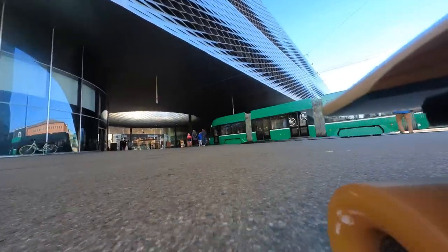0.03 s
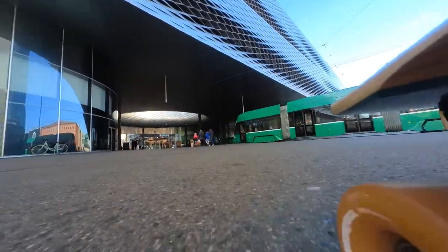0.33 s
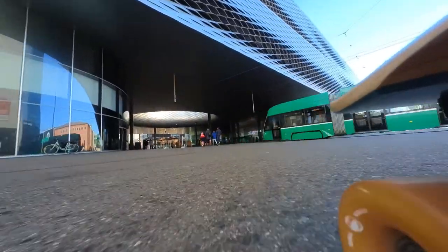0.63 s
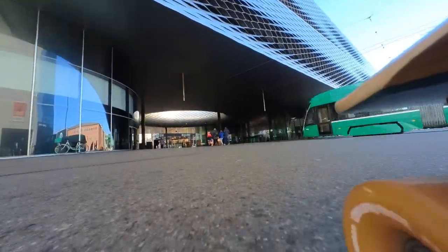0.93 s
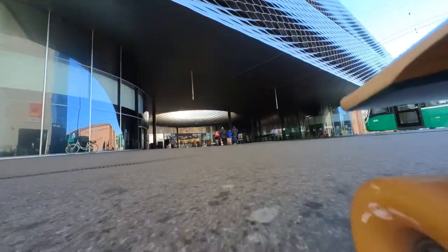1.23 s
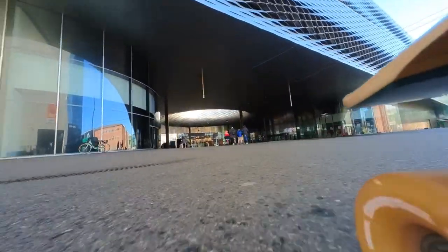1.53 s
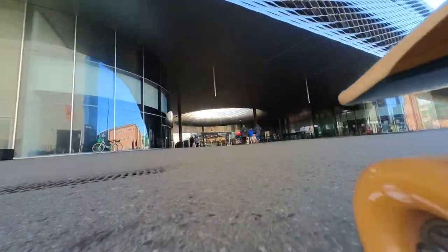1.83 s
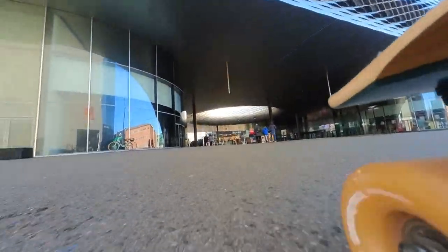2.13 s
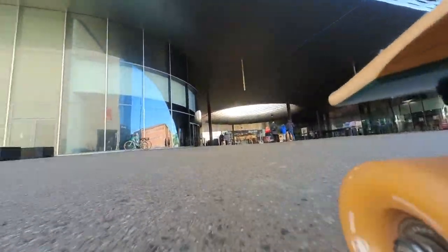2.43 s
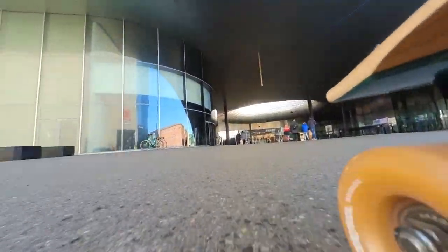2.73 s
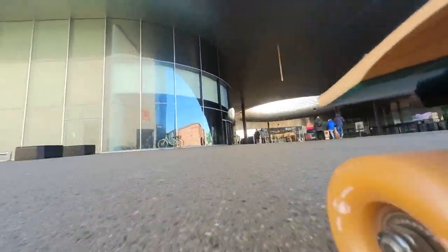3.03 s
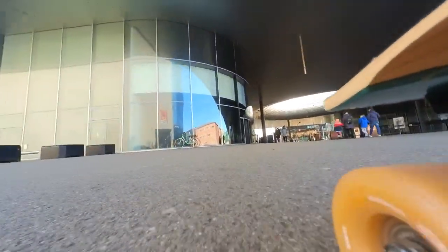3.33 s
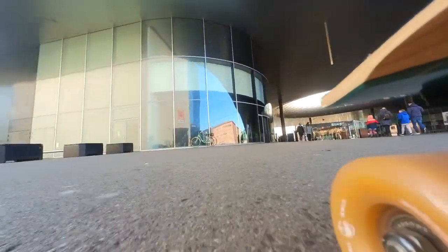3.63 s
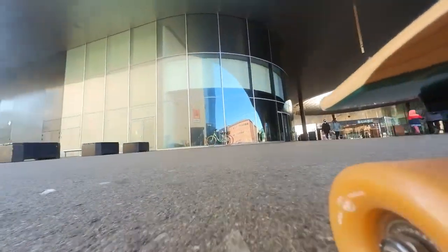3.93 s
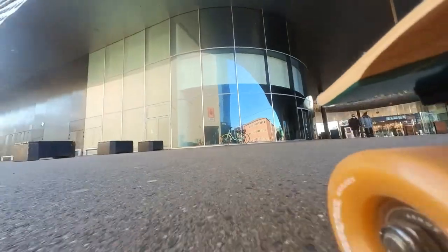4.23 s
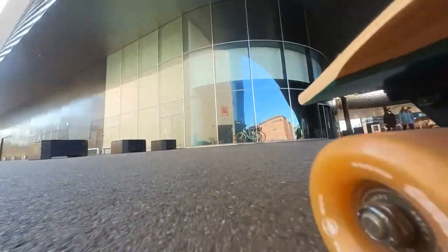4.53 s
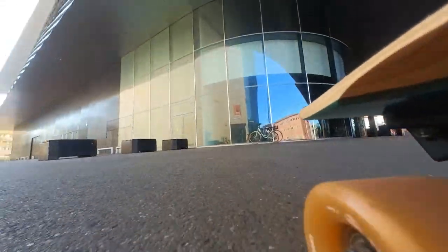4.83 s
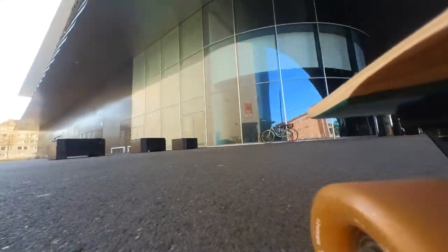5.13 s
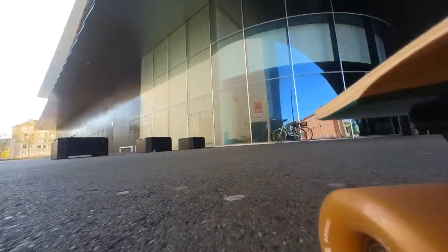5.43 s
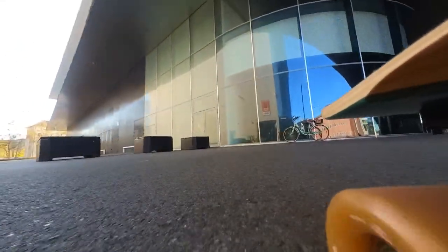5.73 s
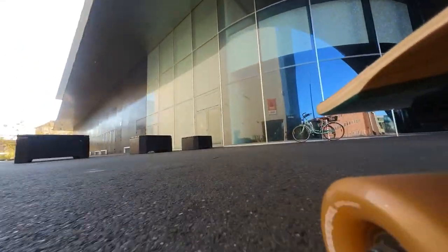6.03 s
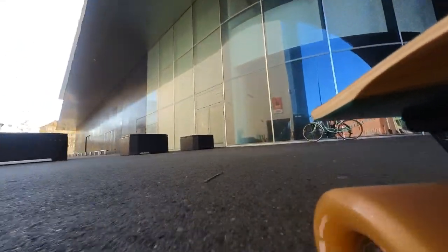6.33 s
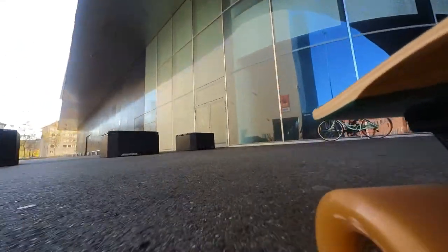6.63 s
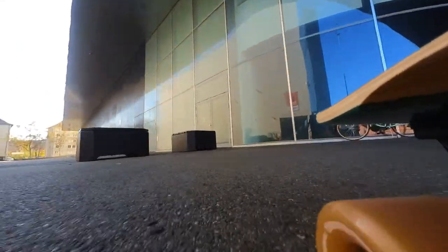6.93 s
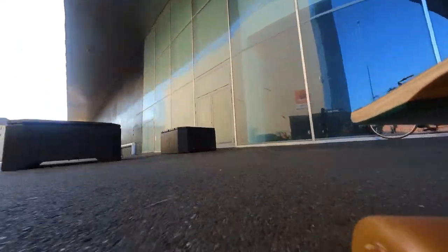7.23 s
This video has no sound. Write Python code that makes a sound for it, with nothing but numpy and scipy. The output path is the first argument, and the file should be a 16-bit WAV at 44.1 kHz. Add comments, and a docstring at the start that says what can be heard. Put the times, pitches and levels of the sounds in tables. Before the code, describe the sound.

A skateboard rolls over asphalt throughout, heard from right beside one wheel: a low, drumming rumble with fine hiss and scattered crunches of grit. A tram's steel wheels hiss and sing faintly on the rails for the first two seconds, fading by about three. The board bumps at 1.8 seconds, crunches over sand at 2.2, and thumps several times between 2.9 and 3.5. From about 4.1 to 4.6 seconds the wheels scrub sideways through a turn, the truck rattles and small stones tick away. The rolling is quieter around five seconds. From 5.5 seconds rough patches bring clusters of loud deck thumps and wheel knocks, with a sharp gritty crunch and clack at 6.5. More scrubbing, clacks and bumps follow from 6.9 until the end at about 7.5 seconds. The plaza roof overhead adds a faint echo.

```python
"""Skateboard under a plaza roof

Heard from beside one wheel: stones in the asphalt drum on wheels and deck, grit crackles under the tread.
The treads scrub and the truck rattles through a turn. The board quietens, then thumps over rough patches.
A tram's steel wheels hiss and sing on the rails at the start; the roof adds a faint echo."""
import sys
import numpy as np
from scipy import signal
from scipy.fft import rfft, irfft
from scipy.io import wavfile
from scipy.ndimage import uniform_filter1d, minimum_filter1d, map_coordinates

SR = 44100
rng = np.random.default_rng(int(sys.argv[2]) if len(sys.argv) > 2 else 0)


def store_wav(level_fs):
    """Save 16-bit WAV to argv[1]."""
    pcm = np.round(np.clip(np.atleast_2d(level_fs), -1, 1) * 32767)
    wavfile.write(sys.argv[1], SR, pcm.T.astype(np.int16))


N = 330309

# Spectra of deck rumble, grit hiss and crushed grains. Each row: frequency in Hz, level in dB.
DECK_SPECTRUM = [(20, -36), (35, -54), (50, -22), (75, -6.5), (110, -2.5), (160, -3), (220, -3.5),
                 (300, -10), (420, -23), (800, -56), (2000, -96)]
GRIT_SPECTRUM = [(1500, -26), (3000, -2.5), (4000, 2.5), (5500, -1), (7500, 1.5), (9700, -3.5),
                 (10600, -8.5), (11500, -18.5), (13000, -27), (15000, -46)]
CRUNCH_SPECTRUM = [(300, -26), (900, 4.5), (2000, 6.5), (3000, 8.5), (4500, 0.5), (6500, -25), (10000, -37),
                   (14000, -75)]
# The rider's weight shift. Each row: time in seconds, share on the far side from 0 to 1.
WEIGHT_SHIFT = [(4.3, 0.11), (5.2, 0.9)]
# Axle resonances after the shift. Each row: frequency in Hz, width in Hz, lift in dB.
SHIFTED_AXLE_MODES = [(487, 134, 6.8), (622, 140, 5.1)]
# Sideways slips. Each row: start in seconds, length in seconds, crackle, growl and rasp in dB.
SLIPS = [(4.114, 0.287, -46.5, -35.5, -57), (4.41, 0.14, -46, -34.5, -57), (6.9, 0.3, -51, -34, -57),
         (7.197, 0.074, -53, -29.5, -47), (7.33, 0.16, -54, -33, -68)]
SLIP_ATTACK_S, SLIP_RELEASE_S = 0.013, 0.024


def amp(db):
    """Decibels to gain."""
    return 10 ** (np.asarray(db) / 20)


def unit(x):
    """x at rms 1."""
    return x / np.sqrt(np.mean(x ** 2) + 1e-20)


def even(x, span_s):
    """x held near rms 1 over stretches of span_s."""
    width = max(int(span_s * SR), 2)
    power = uniform_filter1d(uniform_filter1d(x ** 2, width), width)
    return x / np.sqrt(np.abs(power) + 1e-20)


def along(points, hz):
    """(Hz, value) points read on a log axis."""
    knots_hz, values = np.transpose(points)
    return np.interp(np.log(hz + 1), np.log(knots_hz + 1), values)


def curves(rows):
    """One value per sample for each column after the time."""
    times_s, *columns = np.transpose(rows)
    return [np.interp(np.arange(N) / SR, times_s, column) for column in columns]


def swells(rows, attack_s, release_s):
    """One gain curve per dB column; each row rises, holds and dies away."""
    gains = 0
    for start_s, length_s, *levels_db in rows:
        t = np.arange(N) / SR - start_s
        envelope = np.clip(t / attack_s, 0, 1) * np.exp(-np.maximum(t - length_s, 0) / release_s)
        gains = gains + amp(levels_db)[:, None] * envelope
    return gains


def wobble(rate_hz):
    """Smooth random curve with knots at rate_hz."""
    knots = rng.standard_normal(int(N * rate_hz / SR) + 4)
    return map_coordinates(knots, [np.arange(N) * rate_hz / SR])


def response(spectrum, modes=None, size=8192):
    """Minimum-phase impulse response of a spectrum lifted by resonances, by default the board's."""
    # Deck, truck and bearing resonances. Each row: frequency in Hz, width in Hz, lift in dB.
    board_modes = [(108, 52, 3), (209.8, 34, 4), (1920, 244, 6), (3200, 290, 2), (4040, 220, 5),
                   (5450, 200, 1.5), (7330, 190, 7)]
    if modes is None:
        modes = board_modes
    hz = np.fft.rfftfreq(size, 1 / SR)
    lift_db = sum(db / (1 + (2 * (hz - mode_hz) / width_hz) ** 2) for mode_hz, width_hz, db in modes)
    cepstrum = irfft(np.log(amp(along(spectrum, hz) + lift_db)))
    cepstrum[1:size // 2] *= 2
    cepstrum[size // 2 + 1:] = 0
    return irfft(np.exp(rfft(cepstrum)))[:size // 2]


def ring(force, body):
    """A force played through an impulse response."""
    return signal.fftconvolve(force, body)[:len(force)]


def add(track, start_s, sound):
    """Mix a sound in at start_s."""
    part = track[max(round(start_s * SR), 0):][:len(sound)]
    part += sound[:len(part)]


def stones(rate_hz, spread_db):
    """Random contact impulses of log-normal size."""
    contacts = rng.random(N) < rate_hz / SR
    return contacts * np.sign(rng.standard_normal(N)) * amp(spread_db * rng.standard_normal(N))


def grains(rate_hz, low_hz, high_hz, swell_s, spread_db, size=240):
    """Tiny fractures: each swells and fades at its own pitch."""
    when, pitch, chance = rng.random((int(rate_hz * N / SR), 3)).T
    t = np.arange(size) / SR
    hz = low_hz + (high_hz - low_hz) * pitch
    strength = amp(spread_db * np.minimum(-np.log(1 - chance), 2 * np.pi))
    envelope = (t / swell_s * np.exp(-t / swell_s)) ** 2
    pings = strength[:, None] * np.sin(2 * np.pi * hz[:, None] * t) * envelope
    samples = (when * N).astype(int)[:, None] + np.arange(size)
    return np.bincount(samples.ravel(), pings.ravel(), N)[:N]


def blow(body, t60_s, rise_s=0.00041, hard=0, size=4096):
    """One rough contact of peak 1: a burst of force, led by an impulse of weight hard, rings the body."""
    t = np.arange(size) / SR
    force = rng.standard_normal(size) * np.exp(-np.log(1000) * t / t60_s) * (1 - np.exp(-t / rise_s))
    force[0] = hard * np.linalg.norm(force)
    sound = ring(force, body)
    return sound / np.abs(sound).max()


def tram():
    """Steel wheels hiss on the rails and sing in short swells as the tram moves away."""
    # Hiss fade. Each row: time in seconds, level in dB.
    fade = [(0, -45), (.9, -47.5), (1.45, -51), (2.2, -52), (3.5, -90)]
    # Rail hiss. Each row: frequency in Hz, level in dB.
    rail_spectrum = [(500, -14), (1050, 11), (1600, -0.5), (2200, -24), (2700, -22), (3400, -8),
                     (4700, -5.5), (6400, -13), (10000, -50), (14000, -65)]
    # Singing wheels. Each row: start and end in seconds, frequency and width in Hz, level in dB.
    wheel_tones = [(-.15, .55, 5500, 300, -55.5), (-.15, 0.47, 4450, 550, -53.5),
                   (.3, 1.15, 4280, 200, -55.5), (1.05, 1.8, 4200, 200, -60), (-.7, 2.2, 1980, 240, -54.5)]
    hiss_gain = amp(curves(fade)[0] + 3.3 * wobble(14.27))
    out = hiss_gain * unit(ring(rng.standard_normal(N), response(rail_spectrum, modes=[])))
    for start_s, end_s, hz, width_hz, db in wheel_tones:
        swell = np.sin(np.pi * np.clip((np.arange(N) / SR - start_s) / (end_s - start_s), 0, 1))
        mode = signal.butter(2, [hz - width_hz / 2, hz + width_hz / 2], "band", fs=SR, output="sos")
        out += amp(db + 0.83 * wobble(11.9)) * swell * unit(signal.sosfilt(mode, rng.standard_normal(N)))
    return out


def roof(x):
    """The roof answers with a diffuse tail whose treble dies first."""
    # Reverberation. Each row: frequency in Hz, T60 in seconds.
    decay_times = [(100, 1.9), (1500, 3.6), (10000, 0.14)]
    hz, t, noise = signal.stft(rng.standard_normal(SR), SR, nperseg=256)
    decay = amp(-60 * t / along(decay_times, hz)[:, None])
    tail = signal.istft(noise * decay, SR, nperseg=256)[1]
    return ring(x, tail / np.linalg.norm(tail))


def sand_streaks():
    """Sand grinds ever louder under the tread, then the wheel runs clear."""
    # Each row: peak time in seconds, build-up in seconds, hiss in dB, crunch in dB.
    streaks = [(2.212, .1, -45, -49), (6.515, 0.11, -48, -43)]
    fall_s = 0.0047
    out = np.zeros(N)
    hiss = unit(ring(stones(rate_hz=3100, spread_db=0.5), response(GRIT_SPECTRUM)))
    crunch = unit(ring(stones(rate_hz=3100, spread_db=0.5), response(CRUNCH_SPECTRUM)))
    for peak_s, build_s, hiss_db, crunch_db in streaks:
        t = np.arange(N) / SR - peak_s
        envelope = np.exp(np.minimum(t / build_s, -t / fall_s))
        out += envelope * (amp(hiss_db) * hiss + amp(crunch_db) * crunch)
    return out


def crunches():
    """Loose grains burst under the tread with a dull crunch and a bright crackle."""
    # Each row: start in seconds, crunch in dB, crackle in dB.
    bursts = [(0.325, -37, -35), (1.287, -48, -39), (1.326, -41, -35.5), (1.4354, -46, -36),
              (1.459, -39, -37), (1.536, -52, -40), (1.594, -48, -38), (1.7565, -48, -39.5),
              (1.9003, -35, -38), (2.006, -51, -35.5), (2.2001, -30, -33), (2.4633, -50, -37),
              (2.545, -50, -42), (2.71, -33.5, -48), (2.848, -48, -44), (2.997, -36, -51),
              (3.0675, -45, -39), (3.258, -54, -40), (3.473, -47, -38), (3.526, -35, -43),
              (4.502, -42, -37), (4.853, -33.5, -37.5), (5.545, -31, -34), (6.319, -52, -46),
              (6.463, -36, -32), (6.5, -23, -27), (6.508, -22.5, -26), (6.617, -48, -39), (6.81, -42, -40),
              (6.882, -40, -38), (6.932, -48, -36), (7.1137, -40, -42), (7.2, -39, -34), (7.43, -46, -39)]
    # Each row: frequency in Hz, level in dB.
    crackle_spectrum = [(2500, -23), (5500, 0), (8000, 2), (10000, -3), (11000, -15), (12500, -25),
                        (14000, -41)]
    out, dull, bright = np.zeros(N), response(CRUNCH_SPECTRUM), response(crackle_spectrum)
    for start_s, crunch_db, crackle_db in bursts:
        add(out, start_s, amp(crunch_db) * blow(dull, t60_s=0.056, rise_s=0.0051))
        add(out, start_s, amp(crackle_db) * blow(bright, t60_s=0.05, rise_s=0.008))
    return out


def flicks():
    """Small stones flick out from under a slipping tread, each with one dry tick."""
    # Each row: start in seconds, level in dB, pitch in Hz.
    ticks = [(4.147, -31, 2000), (4.174, -34, 2700), (4.228, -35, 3300), (4.239, -34, 2500),
             (4.256, -37, 3500), (4.272, -34, 2500), (4.419, -35, 3200), (4.442, -33, 3600),
             (4.493, -31, 4400), (4.543, -37, 2200), (4.551, -39, 2000), (6.534, -30, 1200),
             (6.552, -35, 1300), (7.131, -30, 1200), (7.27, -34, 1700)]
    # Each row: frequency in Hz, level in dB.
    tick_spectrum = [(300, -27), (1200, 8), (4500, -3), (7000, -20), (13000, -45)]
    width_hz, lift_db = 1000, 12
    out = np.zeros(N)
    for start_s, db, hz in ticks:
        stone = response(tick_spectrum, [(hz, width_hz, lift_db)])
        add(out, start_s, amp(db) * blow(stone, t60_s=0.0061, hard=0.7))
    return out


def axle(force):
    """Wheel and axle ring differently as the weight moves across them."""
    # Each row: frequency in Hz, level in dB.
    wheel_spectrum = [(120, -27), (250, 0), (340, 1.5), (480, -2), (680, -6), (780, -11), (1050, -28),
                      (1400, -29.5), (2200, -31), (5000, -73)]
    # Axle resonances before the shift. Each row: frequency in Hz, width in Hz, lift in dB.
    initial_modes = [(420, 43, 6.5), (646, 110, 3.5)]
    lean, = curves(WEIGHT_SHIFT)
    before = ring(force, response(wheel_spectrum, initial_modes))
    after = ring(force, response(wheel_spectrum, SHIFTED_AXLE_MODES))
    return (1 - lean) * before + lean * after


def scrub():
    """In turns the treads slip sideways: tiny catches crackle, ring the axle and make the tread rasp."""
    # Spectra of the slipping tread. Each row: frequency in Hz, level in dB.
    catch_spectrum = [(200, -5), (400, 7), (660, 15), (850, -7), (1300, -1), (1750, -2), (2500, 2),
                      (3200, 0), (4000, -6), (4900, -9), (6000, -9), (12000, -52)]
    rasp_spectrum = [(600, -16), (1100, 2), (1300, -11), (1550, -2), (1850, 10), (2000, -8), (2200, -15),
                     (2700, -10), (3200, -41), (10000, -74)]
    crackle_gain, growl_gain, rasp_gain = swells(SLIPS, SLIP_ATTACK_S, SLIP_RELEASE_S)
    catches = stones(rate_hz=600, spread_db=3) * amp(3 * wobble(120))
    crackle = ring(catches, response(catch_spectrum))
    growl = axle(stones(rate_hz=980, spread_db=2.5))
    rasp = ring(stones(rate_hz=700, spread_db=3), response(rasp_spectrum, modes=[]))
    return (crackle_gain * even(crackle, span_s=0.16)
            + growl_gain * even(growl, span_s=0.021)
            + rasp_gain * even(rasp, span_s=0.021))


def strike(spectrum, t60_s, hard):
    """Each strike lands on another spot and rings a little higher or lower."""
    shift = 1 + 0.038 * np.clip(rng.standard_normal(), -2, 2)
    return blow(response([(hz * shift, db) for hz, db in spectrum]), t60_s, hard=hard)


def clacks():
    """The rattling truck and stones under the wheel clack, snap and click; soft contacts stay dull."""
    # Each row: start in seconds, clack in dB, clack pitch in Hz, snap in dB, click in dB, cutoff in Hz.
    contacts = [(4.133, -34, 600, -27, -21, 3900), (4.163, -23, 500, -34, -35, 4000),
                (4.179, -29, 700, -30, -33, 3500), (4.2, -16, 650, -28, -26, 4200),
                (4.304, -19, 480, -32, -27, 6000), (4.31, -15, 695, -28, -24, 6000),
                (4.341, -19, 600, -38, -29, 6000), (4.3625, -14, 620, -18, -35, 2600),
                (4.379, -26, 420, -31, -21, 5200), (4.39, -18, 380, -28, -29, 4600),
                (4.404, -18, 554, -26, -27, 6000), (4.449, -20, 720, -29, -26, 5400),
                (4.475, -35, 655, -36, -29, 3800), (4.487, -26, 800, -30, -27, 6000),
                (4.5035, -12.5, 590, -26, -23.5, 9000), (4.526, -21, 640, -38, -38, 3000),
                (4.858, -19.5, 500, -22, -31, 3800), (5.545, -31, 380, -28, -38, 4000),
                (5.551, -17, 340, -35, -42, 3000), (5.661, -13, 620, -34, -55, 1200),
                (5.715, -16, 660, -34, -55, 1200), (5.728, -21, 630, -13, -42, 1750),
                (6.47, -15, 510, -44, -48, 3000), (6.505, -15, 475, -33, -31, 9000),
                (6.511, -9, 490, -22, -27, 9000), (7.202, -17, 595, -26, -42, 5000),
                (7.211, -22, 600, -30, -45, 2220), (7.222, -16, 600, -40, -55, 1500),
                (7.233, -23, 620, -33, -50, 2000)]
    # Contact spectra. Each row: frequency in Hz, level in dB.
    clack_spectrum = [(100, -20), (300, 5), (520, 2), (700, 5), (880, -11), (1100, -19), (1800, -22),
                      (5000, -61), (12000, -91)]
    snap_spectrum = [(300, -30), (800, 8.5), (1250, 0), (1650, -6), (1950, -10.5), (2400, -13), (5000, -35),
                     (12000, -73)]
    click_spectrum = [(800, -5), (2000, -11), (3200, -1.5), (4100, -6), (5000, -1), (6200, -14), (9500, -8),
                      (12500, -41)]
    width_hz, lift_db = 140, 7
    out = np.zeros(N)
    for start_s, clack_db, clack_hz, snap_db, click_db, cutoff_hz in contacts:
        body = response(clack_spectrum, [(clack_hz, width_hz, lift_db)])
        add(out, start_s, amp(clack_db) * blow(body, t60_s=0.04, hard=1.7))
        snap = amp(snap_db) * strike(snap_spectrum, t60_s=0.01, hard=1.0)
        click = amp(click_db) * strike(click_spectrum, t60_s=0.013, hard=0.81)
        lowpass = signal.butter(6, cutoff_hz, fs=SR, output="sos")
        add(out, start_s, signal.sosfilt(lowpass, snap + click))
    return out


def rough_patches():
    """Big stones make the deck boom and the wheel judder."""
    # Each row: start in seconds, length in seconds, boom in dB, judder in dB.
    patches = [(2.9, 0.17, -26, -52), (5.23, 0.293, -29, -53), (5.6, 0.068, -34, -31),
               (5.75, 0.054, -22, -35), (6.0, 0.083, -21, -37), (6.153, 0.2, -18, -36),
               (6.51, 0.068, -24.5, -44), (6.913, 0.24, -21.5, -38)]
    # Each row: frequency in Hz, level in dB.
    judder_spectrum = [(120, -23), (290, 5), (420, 2.5), (580, -5.5), (1000, -34), (3000, -62),
                       (12000, -110)]
    boom_gain, judder_gain = swells(patches, attack_s=0.069, release_s=0.014)
    boom = ring(stones(rate_hz=1200, spread_db=4.0), response(DECK_SPECTRUM))
    judder = ring(stones(rate_hz=1100, spread_db=1.5), response(judder_spectrum))
    return boom_gain * even(boom, span_s=0.12) + judder_gain * even(judder, span_s=0.035)


def bumps():
    """Each drop over a bump thumps the deck and knocks the wheel."""
    # Each row: start in seconds, thump in dB, knock in dB.
    drops = [(1.797, -19, -17), (2.884, -19, -21), (2.914, -27, -19.5), (3.073, -14, -24),
             (3.229, -19, -20.5), (3.328, -28, -29), (3.475, -15, -24), (4.163, -13, -27),
             (4.187, -17, -30), (4.265, -25, -26), (4.384, -19, -21), (4.522, -36, -16.5),
             (4.652, -26, -19), (5.547, -16.5, -16.5), (5.555, -6.5, -19), (5.614, -15, -15.5),
             (5.627, -17, -14), (5.632, -15, -13), (5.647, -32, -22), (5.661, -13, -12), (5.669, -5, -12),
             (5.682, -4, -13), (5.717, -7, -30), (5.728, -5, -37), (5.764, -12, -28), (5.804, -21, -31),
             (6.026, -14, -32), (6.055, -11, -27), (6.157, -10, -30), (6.18, -15, -18), (6.198, -3, -24),
             (6.296, -7.5, -20), (6.486, -17, -16), (6.498, -19, -19), (6.516, -5, -14),
             (6.883, -28, -15.5), (6.935, -24, -19), (7.021, -14, -13), (7.066, -11, -17),
             (7.129, -19, -16.5), (7.34, -14, -20), (7.373, -14, -35), (7.39, -20, -23),
             (7.431, -13.5, -32)]
    # Impact spectra. Each row: frequency in Hz, level in dB.
    thump_spectrum = [(25, -26), (60, -7.5), (110, -1), (220, -4), (400, -17.5), (1000, -47.5), (3000, -62),
                      (12000, -120)]
    knock_spectrum = [(100, -20), (220, -3), (330, 6), (480, -4), (650, -9.5), (820, -21), (1100, -25),
                      (1500, -42), (4000, -67), (12000, -115)]
    out, deck, wheel = np.zeros(N), response(thump_spectrum), response(knock_spectrum, SHIFTED_AXLE_MODES)
    for start_s, thump_db, knock_db in drops:
        add(out, start_s, amp(thump_db) * blow(deck, t60_s=0.04, hard=0.56))
        add(out, start_s, amp(knock_db) * blow(wheel, t60_s=0.028, hard=1.0))
    return out


def grit_crackle():
    """Sand, cracking grains and pebbles crackle under the tread."""
    sand = unit(stones(rate_hz=8000, spread_db=3.0) * amp(0.8 * wobble(25)))
    cracks = grains(rate_hz=850, low_hz=4920, high_hz=11730, swell_s=0.00053, spread_db=0)
    cracks = unit(cracks * amp(0.97 * wobble(22)))
    pebbles = grains(rate_hz=110, low_hz=5500, high_hz=10500, swell_s=0.00009, spread_db=2.2)
    pebbles = unit(pebbles * amp(1.5 * wobble(30)))
    return ring(sand + amp(-6) * cracks + amp(-8) * pebbles, response(GRIT_SPECTRUM))


def rolling_gains():
    """Speed and coarseness set deck, wheel, tread and grit; leaning and slipping take the load off."""
    # Board speed and asphalt coarseness. Each row: time in seconds, relative value in dB.
    speed = [(0, -1), (1.45, -0.5), (2.5, -2.5), (3.0, -3), (3.5, -5), (4.7, -6), (5.2, -8.5), (6.25, -8.5),
             (6.75, -7), (7.0, -3), (7.49, -9.5)]
    coarseness = [(0, 0), (.3, 1), (1.15, -0.5), (1.65, 1), (1.95, 3), (2.6, 1), (3.0, 0.5), (3.8, 0.5),
                  (4.65, -0.5), (5.07, -6.5), (5.33, -4), (5.5, 1), (5.8, 2), (5.98, -1), (6.3, 2.5),
                  (6.55, 5), (6.75, 0.5), (7.05, 4), (7.49, 2.5)]
    # Each law: base level in dB, dB per dB of speed, dB per dB of coarseness.
    deck_law = (-23.5, 0.5, 0.86)
    wheel_law = (-28, 0.78, 0.97)
    tread_law = (-38.5, 1, 0.042)
    grit_law = (-52.5, 0.28, 0.96)
    full_slip_db, slip_cut_db, lean_cut_db = -43, 6.5, 4
    speed_db, coarse_db, lean = curves(speed)[0], curves(coarseness)[0], curves(WEIGHT_SHIFT)[0]
    deck, wheel, tread, grit = (amp(db + by_speed * speed_db + by_coarse * coarse_db)
                                for db, by_speed, by_coarse in (deck_law, wheel_law, tread_law, grit_law))
    crackle_gain = swells(SLIPS, SLIP_ATTACK_S, SLIP_RELEASE_S)[0]
    slip = np.minimum(crackle_gain / amp(full_slip_db), 1)  # a slipping tread skims the stones
    return deck * amp(-slip_cut_db * slip ** 2), wheel * amp(-lean_cut_db * lean), tread, grit


def rolling():
    """Coarse stones shake the deck, finer ones the wheels; the tread hisses and crackles over grit."""
    # Each row: frequency in Hz, level in dB.
    tread_spectrum = [(450, -24), (780, 3), (920, 6), (1200, 0.5), (1550, -6.5), (2500, -12.5), (3200, -14),
                      (4500, -17), (6000, -24.5), (14000, -94)]
    deck_gain, wheel_gain, tread_gain, grit_gain = rolling_gains()
    load = wobble(110)  # contact pressure flutters as the board chatters
    deck = ring(stones(rate_hz=2500, spread_db=1.0) * amp(0.25 * load), response(DECK_SPECTRUM))
    wheel = axle(stones(rate_hz=1500, spread_db=2) * amp(0.22 * load))
    tread = ring(stones(rate_hz=6000, spread_db=1.5) * amp(0.5 * load), response(tread_spectrum))
    grit = grit_crackle()
    texture_db = 3.1 * np.tanh(wobble(28))  # fine texture varies along the asphalt
    return (deck_gain * amp(0.79 * wobble(15)) * even(deck, span_s=0.11)
            + wheel_gain * even(wheel, span_s=0.053)
            + tread_gain * even(tread, span_s=0.39)
            + grit_gain * amp(texture_db) * even(grit, span_s=0.12))


def scene():
    """The close board, its faint echo and the tram, in mono."""
    board = rolling() + rough_patches() + scrub() + sand_streaks()
    board += bumps() + clacks() + flicks() + crunches()
    return (board + amp(-20.5) * roof(board) + tram())[None]


def limiter(x, ceiling_db, hold_s):
    """The gain ducks smoothly just ahead of each peak that would pass the ceiling."""
    width = max(int(hold_s * SR), 2)
    needed = np.minimum(1, amp(ceiling_db) / (np.abs(x) + 1e-9))
    held = minimum_filter1d(needed, 2 * width)
    return x * uniform_filter1d(uniform_filter1d(held, width), width)


def record(dry):
    """Peak limiter, then a steep 13 kHz low-pass."""
    limited = limiter(dry, ceiling_db=-10.9, hold_s=0.004)
    return signal.sosfilt(signal.ellip(10, 0.1, 90, 13000, fs=SR, output="sos"), limited)


dry = scene()
out = record(dry)
store_wav(out)
```